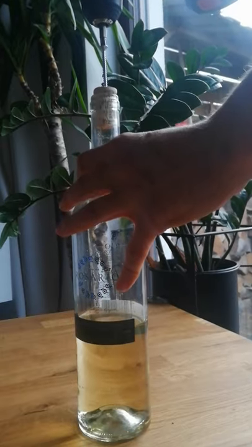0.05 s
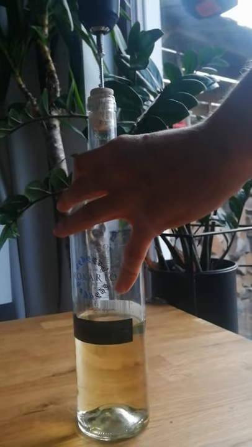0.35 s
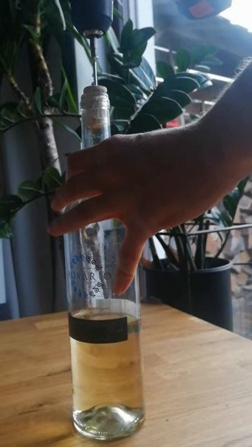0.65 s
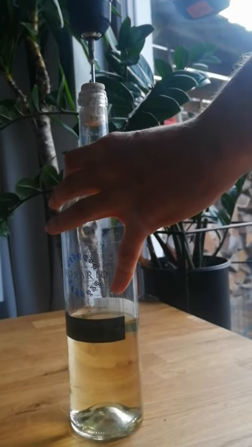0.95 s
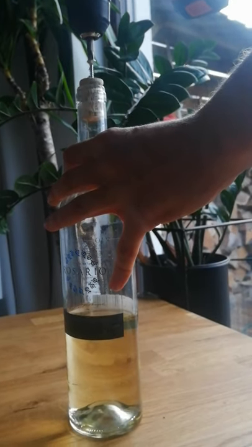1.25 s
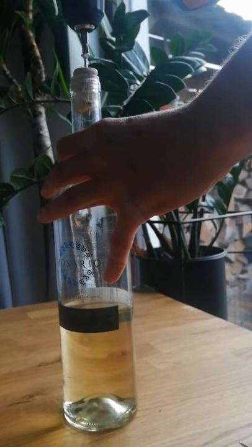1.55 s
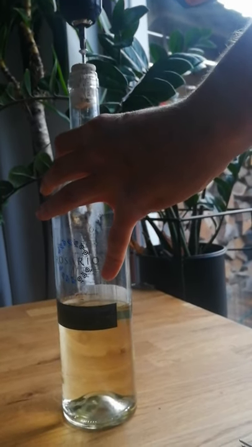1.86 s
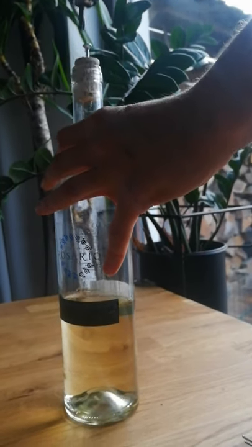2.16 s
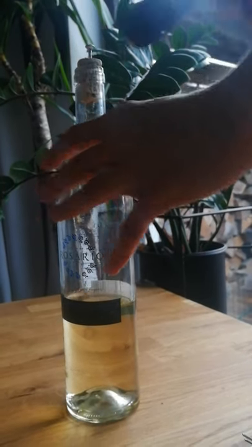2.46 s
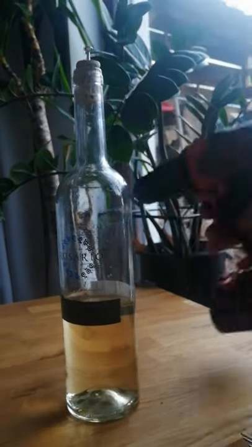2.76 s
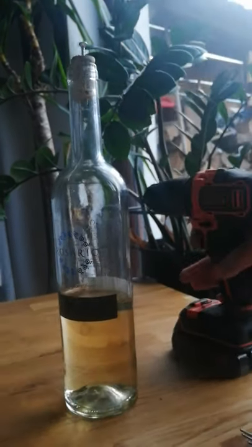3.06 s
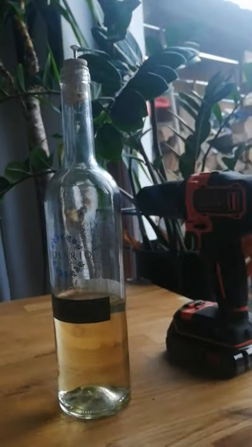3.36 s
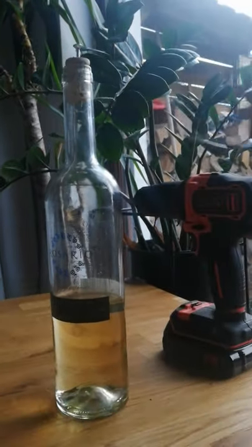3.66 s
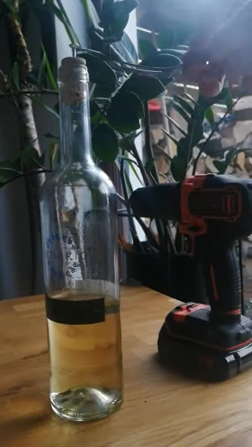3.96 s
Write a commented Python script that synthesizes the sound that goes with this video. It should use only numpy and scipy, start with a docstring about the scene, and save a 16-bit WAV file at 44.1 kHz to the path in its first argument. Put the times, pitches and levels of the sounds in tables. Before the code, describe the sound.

Indoors, a cordless drill runs with a high whine and rattling gears, sinking in pitch as the screw bites. It stops with light clacks, blips once more, then knocks and rocks onto a wooden tabletop.

```python
"""A cordless drill drives a screw into the cork of a glass bottle on a wooden table, slowing as it bites.
Motor and gears sound at multiples of the shaft rate, over gear rattle and the speed controller's whine.
The bit judders and jolts the bottle into its modes, and again on a short second squeeze of the trigger.
The drill is then stood on the table, where it rubs and rocks on its battery; a live room reverberates."""
import sys
import numpy as np
from scipy import signal
from scipy.fft import rfft, irfft
from scipy.io import wavfile
from scipy.ndimage import uniform_filter1d, map_coordinates

SR = 44100
rng = np.random.default_rng(int(sys.argv[2]) if len(sys.argv) > 2 else 0)


def generate_wav(signal):
    """Clip the signal to [-1, 1] and save it as 16-bit WAV at the path in sys.argv[1]."""
    frames = np.transpose(np.atleast_2d(signal))
    scaled = np.clip(frames, -1, 1) * 32767
    pcm = np.round(scaled).astype(np.int16)
    wavfile.write(sys.argv[1], SR, pcm)


N = 176400

# rotation of the motor shaft (time [s], rate [turns/s])
SHAFT_RATE = [(0, 165), (.1, 170.2), (.17, 170.4), (.45, 167.3), (.7, 161.4), (1.0, 155.7), (1.2, 151.7),
              (1.33, 152.4), (1.55, 152.8), (1.6, 137), (1.7, 110), (1.77, 100), (1.9, 25), (1.99, 20),
              (2.05, 100), (2.15, 100), (2.3, 20)]
# envelope of motor and gear sound (time [s], level [dB])
DRIVE_LEVEL = [(0, -3), (.25, -1), (.8, -0.5), (1.25, 0.5), (1.55, 0), (1.66, -2.5), (1.755, -12.5),
               (1.79, -26.5), (1.87, -56), (1.99, -24.5), (2.035, -6.5), (2.08, -2.5), (2.155, -16),
               (2.19, -29.5), (2.3, -51)]
# motor and gear tones (order [shaft multiples], light level [dB], loaded level [dB])
SHAFT_ORDERS = [(2.64, -58, -54), (3, -39, -43), (4, -50, -49), (9, -37, -39), (10, -45, -47),
                (11, -51, -52), (12, -40, -46), (13.1, -54, -51), (19.14, -43, -44), (19.62, -54, -49),
                (27, -58, -64), (30, -55, -59), (39, -60, -65), (43, -65, -61), (67, -66, -74)]
# controller tones (switching harmonic [number], offset [shaft multiples], light [dB], loaded [dB])
WHINE_PARTIALS = [(1, 0, -47, -51), (1, 6, -51, -42), (1, -6, -56, -53), (2, 0, -65, -65)]
# trigger squeezes (start [s], end [s])
SQUEEZES = [(-.1, 1.75), (1.995, 2.125)]
# response of the drill's housing (frequency [Hz], gain [dB])
HOUSING_RESPONSE = [(40, -25), (60, -12), (120, -11), (200, -4), (330, -12), (460, -1.5), (620, -13),
                    (900, -11), (1200, -11.5), (1500, -9.5), (1900, -2), (2500, -8), (3200, -2),
                    (3700, -13), (4300, -11), (5000, -15), (6200, -14), (8000, -14), (9700, -23.5),
                    (11400, -25.5), (13000, -39), (15000, -48.5)]
# stereo balance of the drill (frequency [Hz], left minus right [dB])
DRILL_BALANCE = [(200, -5), (600, -1), (1280, 3), (2400, -4), (4400, -0.5), (8000, 1), (12000, 15)]
# background noise of the room (frequency [Hz], spectral level [dB])
AMBIENT_SPECTRUM = [(15, -37), (25, -8), (71, 0), (167, -12), (202, -5.5), (257, -17.5), (286, -9),
                    (673, -21.5), (1090, -24), (1350, -25), (1910, -25.5), (11200, -42.5), (15000, -50)]
# jolts of the bit in the screw
# (time [s], thud [dB], clack [dB], click [dB], left minus right [dB], left lead [ms], pitch [Hz])
BIT_JOLTS = [(1.685, -35, -42, -57, -9.5, .36, 366), (1.700, -31, -38, -58, -5, 0.31, 440),
             (1.736, -32, -34.5, -45, -1, 0.27, 390), (1.749, -36, -51, -68, -4, 0.3, 484),
             (1.947, -43, -63, -69, -2.5, 0.42, 420), (2.026, -34, -49, -66, -3, 0.46, 390),
             (2.067, -28, -36.5, -49, -4.5, 0.31, 440), (2.092, -39.5, -43, -66, -2, 0.34, 410),
             (2.125, -35.5, -41.5, -72, -2, 0.24, 337), (2.153, -44, -42.5, -56.5, -2, 0.39, 412)]
# modes of the bottle standing on the table (frequency [Hz], level [dB], t60 [s])
BOTTLE_MODES = [(60.6, -21.5, 0.78), (115, -16.5, 0.31), (185.5, -15, 0.36), (236, -4, 0.15),
                (314, -2, 0.073), (373, 4.5, 0.038), (440, -0.5, .04), (501, -2, 0.047), (621.5, -7, 0.098)]
# clack of the bit in the screw head (frequency [Hz], spectral level [dB])
BIT_CLACK = [(1500, -1), (2150, 1), (2600, -14), (3200, 2.5), (3700, -12), (6000, -51)]
# bright click of any impact (frequency [Hz], spectral level [dB])
CLICK_SPECTRUM = [(1500, -5), (3500, 6), (5500, 2), (8000, 0.5), (11000, -7), (15000, -23.5)]
# squeaks of the straining motor (time [s], duration [s], frequency [Hz], level [dB])
MOTOR_SQUEAKS = [(1.694, .016, 4220, -45), (2.004, .014, 4230, -37)]
# slides on the wood (time [s], attack [s], hold [s], release t60 [s], centre [Hz], width [Hz], level [dB])
SLIDES = [(2.308, 0.016, 0.015, 0.14, 704, 444, -45), (2.352, 0.0039, 0.05, 0.091, 463, 355, -46.5),
          (3.209, 0.0064, 0.091, 0.38, 163, 220, -40.5), (3.31, 0.035, 0.049, 0.17, 1400, 1570, -48),
          (3.955, 0.035, .05, .1, 740, 700, -33)]
# knocks of the drill on the table and ticks of its plastic
# (time [s], thud [dB], clack [dB], click [dB], left minus right [dB], left lead [ms], pitch [Hz])
BATTERY_KNOCKS = [(2.46, -68.5, -71, -71.5, 6, 0, 496), (2.62, -78, -70, -74.5, -1, 0, 500),
                  (3.048, -24.5, -33.5, -41, -6, 0.35, 440), (3.08, -29, -41.5, -49, 1.5, 0.42, 446),
                  (3.145, -31.5, -34, -59.5, 2, -0.13, 620), (3.222, -30.5, -36.5, -48, -2, -0.12, 700),
                  (3.276, -34, -37, -57.5, 0.5, -0.15, 600), (3.381, -48.5, -44, -85, -3, -0.087, 1610),
                  (3.4, -44.5, -63, -89, -1, -0.21, 1030), (3.567, -63.5, -78, -64.5, -3, -0.1, 700)]
# modes of the battery on the table (frequency [Hz], level [dB], t60 [s])
TABLE_MODES = [(63.4, -23, 1), (120.4, -13.5, 0.23), (185.5, -10, .2), (222, -2.5, 0.11), (348.3, -9, 0.13),
               (420, 1.5, 0.042), (463, 4.5, 0.037), (512.6, 1, 0.079), (619, 3, 0.051), (696, 1.5, 0.036),
               (770, -7, 0.035), (1004, -9, 0.16), (1610, -11.5, 0.17)]
# clack of the battery on the table (frequency [Hz], spectral level [dB])
BATTERY_CLACK = [(500, 0.5), (800, 8), (1100, 12), (1500, 1), (2100, 7), (2900, -10.5), (4000, -35),
                 (8000, -47)]
# reverberation time of the room (frequency [Hz], t60 [s])
ROOM_T60 = [(100, 1), (500, 0.64), (2000, 0.62), (6000, 0.58), (14000, 0.21)]


def undb(db):
    """Amplitude ratio of a level in decibels."""
    return 10 ** (np.asarray(db) / 20)


def unit(x):
    """Normalisation to rms 1."""
    return x / np.sqrt(np.mean(x ** 2))


def clock():
    """Sample times in seconds."""
    return np.arange(N) / SR


def curve(rows):
    """Linear interpolation of (time, value) rows."""
    return np.interp(clock(), *np.array(rows).T)


def fade(t, t60):
    """Exponential decay by 60 dB in t60 seconds."""
    return np.exp(-np.log(1000) * np.maximum(t, 0) / t60)


def along(hz, points):
    """Interpolation on a logarithmic frequency axis."""
    f, v = np.array(points).T
    return np.interp(np.log(np.maximum(hz, 1)), np.log(f), v)


def colour(x, points, share=1):
    """Zero-phase filtering by (frequency, gain) points; share scales the decibels."""
    hz = np.linspace(0, SR / 2, len(x) // 2 + 1)
    return irfft(rfft(x) * undb(share * along(hz, points)), len(x))


def walk(rate):
    """Smooth random modulation of rms 1, with rate new values a second."""
    step = max(int(SR / rate), 1)
    held = np.repeat(rng.standard_normal(N)[:N // step + 1], step)
    return unit(uniform_filter1d(held, step)[:N])


def microphones(x, lead_s):
    """Path difference: the sound reaches the left microphone lead_s before the right."""
    shift = np.exp(1j * np.pi * lead_s * np.linspace(0, SR / 2, len(x) // 2 + 1))
    return irfft(rfft(x) * np.array([shift, 1 / shift]), len(x))


def partial(cycles, load, light_db, loaded_db, waver_db):
    """Amplitude modulation: a sinusoid's level follows the load and wavers at random."""
    wave = np.sqrt(2) * np.sin(2 * np.pi * (cycles + rng.random()))
    return wave * undb(light_db + load * (loaded_db - light_db) + waver_db * walk(35.57))


def motor_tones(turns, carrier_angle, load):
    """Rotation sounds at shaft orders, which under load throb once per turn of the planet carrier."""
    throb = 1 + 0.28 * load * np.sin(carrier_angle)
    return throb * sum(partial(order * turns, load, light, loaded, waver_db=2)
                       for order, light, loaded in SHAFT_ORDERS)


def controller_whine(turns, load, spin):
    """Switching sounds a tone and its octave; modulation by the shaft adds sidebands."""
    t, switch_hz, whine = clock(), 4029.5, 0
    pressed = sum(1. * ((t > start) & (t < end)) for start, end in SQUEEZES)
    for harmonic, offset, light, loaded in WHINE_PARTIALS:
        cycles = harmonic * switch_hz * t + offset * turns
        gain = spin if offset else undb(-0.5 - spin)  # a slow motor whines more
        whine += gain * partial(cycles, load, light, loaded, waver_db=1.2)
    return uniform_filter1d(pressed, SR // 100) * whine


def gear_noise(turns, carrier_angle, load, spin):
    """Periodic tooth impacts and random rattle of loose gears force the housing's resonances."""
    teeth = rng.standard_normal(256)  # force pattern of one turn
    mesh = map_coordinates(teeth, [turns % 1 * len(teeth)], mode="grid-wrap")
    mesh = undb(-43) * spin * (1 - load / 2) * unit(colour(mesh, HOUSING_RESPONSE))
    wobble = 1 + 0.1 * (np.sin(carrier_angle) + np.sin(2 * carrier_angle))
    rattle = rng.standard_normal(N) * undb(3 * walk(1200)) * wobble
    return mesh + undb(-38) * unit(colour(rattle, HOUSING_RESPONSE))


def drill():
    """One shaft sets the pitch of motor and gears; its loss of speed stands for the load."""
    rate, drive = curve(SHAFT_RATE), undb(curve(DRIVE_LEVEL))
    light_rate, loaded_rate, toneless_rate = 168, 153, 124  # turns/s
    load = np.clip((light_rate - rate) / (light_rate - loaded_rate), 0, 1)
    spin = np.clip((rate - toneless_rate) / (loaded_rate - toneless_rate), 0, 1)
    turns = np.cumsum(rate * (1 + .0012 * walk(90))) / SR
    carrier_angle = 2 * np.pi * .245 * turns
    tones = spin * drive * motor_tones(turns, carrier_angle, load)
    whine = controller_whine(turns, load, spin)
    mechanism = drive * gear_noise(turns, carrier_angle, load, spin) + motor_squeaks()
    # other faces of the housing send each microphone its own rattle
    faces = np.array([unit(colour(rng.standard_normal(N), HOUSING_RESPONSE)) for _ in range(2)])
    radiated = microphones(mechanism, lead_s=.0003643) + drive * undb(-41.5) * faces
    left, right = room(radiated, wet_db=-13) + microphones(tones, lead_s=.0004) + whine
    return np.array([colour(left, DRILL_BALANCE, 0.92), colour(right, DRILL_BALANCE, -0.082)])


def diffuse_field():
    """One second of diffuse noise, coherent between the microphones only in the bass."""
    hz, corner_hz = np.linspace(0, SR / 2, SR // 2 + 1), 530
    coherence = 1 / (1 + (hz / corner_hz) ** 4)
    mid, side = rfft(rng.standard_normal((2, SR)))
    return irfft(np.sqrt(1 + coherence) * mid + np.sqrt(1 - coherence) * side * np.array([[1], [-1]]))


def room(x, wet_db):
    """Reverberation: direct sound, early reflections off table and window, and a tail that dulls."""
    t, hz = clock()[:SR], np.linspace(0, SR / 2, SR // 2 + 1)
    centres = np.geomspace(ROOM_T60[0][0], ROOM_T60[-1][0], len(ROOM_T60) * 2)
    noise, tail = rfft(diffuse_field()), 0
    for centre in centres:
        band = along(hz, list(zip(centres, centres == centre)))
        tail += irfft(noise * band) * fade(t, along(centre, ROOM_T60))
    tail *= np.minimum(t / 0.006, 1)
    early = diffuse_field() * fade(t, t60=.09) * (t > .002)
    response = undb(wet_db) * tail / np.linalg.norm(tail[0])
    response += undb(-3.5) * early / np.linalg.norm(early[0])
    return x + signal.fftconvolve(x, response, axes=1)[:, :N]


def ambient_noise():
    """Quiet rumble and hiss of the room, partly correlated between the microphones."""
    mid, side = (unit(colour(rng.standard_normal(N), AMBIENT_SPECTRUM)) for _ in range(2))
    return undb(-63) * (mid + 0.69 * side * np.array([[1], [-1]]))


def impacts(rows, modes, clack_spectrum):
    """Modal response: a chattering blow rings the modes near its pitch most, with a clack and a click."""
    t, contact_s = clock()[:SR // 2], 0.006
    out = np.zeros((2, N + SR))
    for start, thud_db, clack_db, click_db, pan_db, lead_ms, pitch_hz in rows:
        noise = rng.standard_normal((3, len(t)))
        force = noise[0] * fade(t, t60=.12)
        force *= .35 / np.linalg.norm(force)
        force[0] += 1  # the impulse that leads the chatter
        ring = 0
        for hz, db, t60 in modes:
            octaves_off = min(abs(np.log2(hz / pitch_hz)), 1)
            detuned_hz = hz * (1 + 0.011 * rng.standard_normal())
            ring += undb(db - 14 * octaves_off) * np.sin(2 * np.pi * detuned_hz * t) * fade(t, t60)
        thud = signal.fftconvolve(ring * np.minimum(t / contact_s, 1), force)[:len(t)]
        clack = colour(noise[1], clack_spectrum) * fade(t, t60=.055)
        click = colour(noise[2], CLICK_SPECTRUM) * fade(t, t60=.035)
        hit = sum(undb(db) * x / np.sqrt(np.mean(x[:SR // 40] ** 2))  # rms of the first 25 ms
                  for db, x in ((thud_db, thud), (clack_db, clack), (click_db, click)))
        balance = undb(np.array([[pan_db], [-pan_db]]) / 2)
        i = int(start * SR)
        out[:, i:i + len(t)] += microphones(hit, lead_ms / 1000) * (1 - t / t[-1]) * balance
    return out[:, :N]


def bottle_jolts():
    """Impulsive excitation: the juddering bit sets the bottle ringing on the table."""
    return room(impacts(BIT_JOLTS, BOTTLE_MODES, BIT_CLACK), wet_db=-10.5)


def motor_squeaks():
    """The straining motor squeaks: brief frequency-modulated tones with a weak second harmonic."""
    t, out = clock(), 0
    for start, duration, hz, db in MOTOR_SQUEAKS:
        phase = 2 * np.pi * np.cumsum(hz * (1 + .02 * walk(500))) / SR
        envelope = np.sin(np.pi * np.clip((t - start) / duration, 0, 1))
        out += undb(db) * envelope * (np.sin(phase) + undb(-18) * np.sin(2 * phase))
    return out


def table_rubs():
    """Sliding friction on the wood drives one broad resonance with grainy noise."""
    t, f, out = clock(), np.linspace(1, SR / 2, N // 2 + 1), 0
    for start, attack, hold, release, hz, width, db in SLIDES:
        grain = rng.standard_normal(N) * undb(2.5 * walk(250))
        detuning = (f / hz - hz / f) * hz / width / 1.3
        drone = irfft(rfft(grain) / (1 + 1j * detuning) ** 3)
        envelope = np.clip((t - start) / attack, 0, 1) * fade(t - start - attack - hold, release)
        out += undb(db) * unit(drone) * envelope
    return room(microphones(out, lead_s=-.00013), wet_db=-15)


def battery_knocks():
    """Each impact of the rocking drill excites the damped modes of battery and table."""
    return room(impacts(BATTERY_KNOCKS, TABLE_MODES, BATTERY_CLACK), wet_db=-6.5)


def scene():
    """Superposition of all the sources in one room."""
    return bottle_jolts() + battery_knocks() + drill() + table_rubs() + ambient_noise()


def record(dry):
    """Band limiting: an elliptic low-pass cuts the top of the treble."""
    cutoff_hz = 15200
    return signal.sosfilt(signal.ellip(10, .2, 80, cutoff_hz, fs=SR, output="sos"), dry)


dry = scene()
out = record(dry)
generate_wav(out)
```